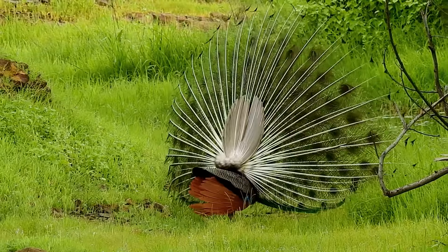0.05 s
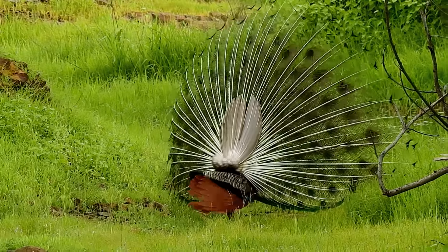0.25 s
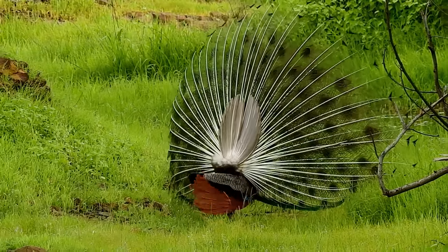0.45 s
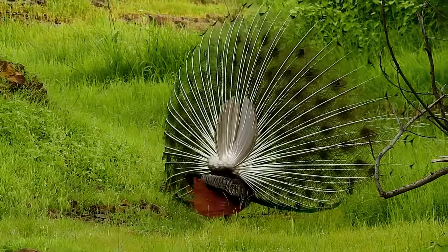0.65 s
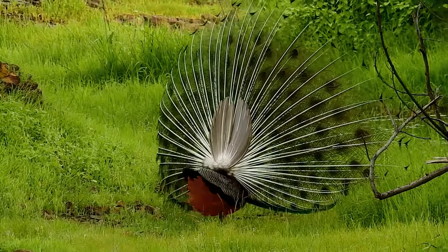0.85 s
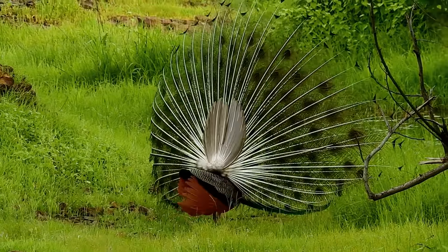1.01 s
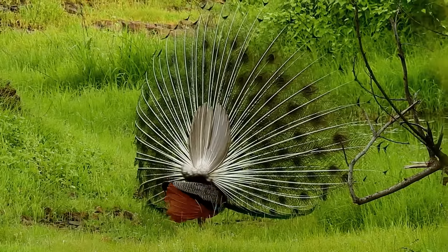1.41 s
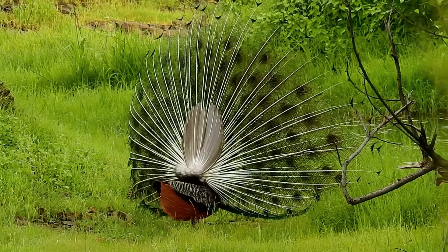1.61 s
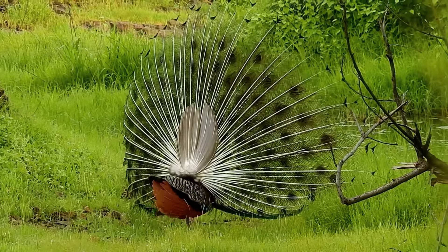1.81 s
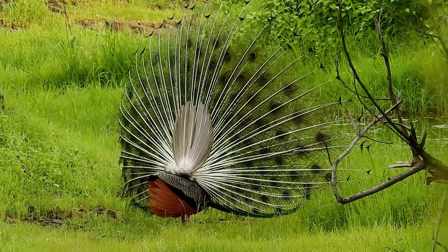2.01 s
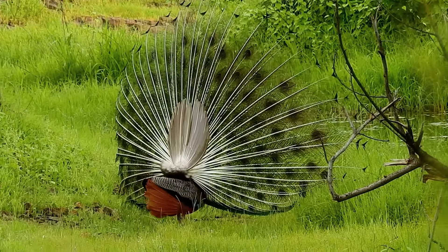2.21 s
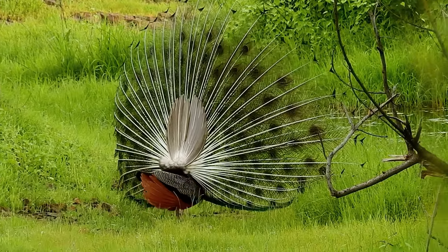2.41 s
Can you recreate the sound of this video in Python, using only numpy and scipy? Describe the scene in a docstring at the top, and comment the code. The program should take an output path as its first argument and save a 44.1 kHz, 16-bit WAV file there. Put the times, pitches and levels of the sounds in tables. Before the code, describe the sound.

A small bird whistles about thirteen quick, high, falling chirps from 0.4 to 1.2 seconds, echoing lightly off trees. Just before, from 0.2 seconds, something dry is handled close by, rustling and snapping, loudest near 0.3 seconds, with a last snap and soft knock around 0.5. A low far-off rumble and faint distant birds fill the meadow throughout and continue alone until about 2.5 seconds.

```python
"""A meadow at the edge of trees: a low far-off rumble and distant birds are heard from the start.
From 0.2 s something dry is handled close by: it rubs, rustles, knocks softly and snaps,
loudest at 0.28 s and for the last time at 0.46 s. From 0.38 s to 1.2 s a small bird whistles
thirteen quick falling chirps that scatter back from the trees. Then the rumble and far birds go on."""
import sys
import numpy as np
from scipy import signal
from scipy.fft import rfft, irfft
from scipy.io import wavfile
from scipy.ndimage import map_coordinates

SR = 44100
rng = np.random.default_rng(int(sys.argv[2]) if len(sys.argv) > 2 else 0)


def to_wav(s):
    """Save 16-bit WAV."""
    ch = np.atleast_2d(s).T  # columns
    pcm = np.round(np.clip(ch, -1, 1) * 32767)  # PCM
    wavfile.write(sys.argv[1], SR, pcm.astype(np.int16))


N = 112454
TIME = np.arange(N) / SR
FREQS = np.fft.rfftfreq(N, 1 / SR)


def from_db(db):
    """Turn decibels into a number to multiply by."""
    return 10 ** (np.asarray(db) / 20)


def rms_one(x):
    """Scale a sound so that its average strength (rms) is 1."""
    return x / np.sqrt(np.mean(x ** 2) + 1e-20)


def pan(db):
    """Left and right gains that make the left side louder by db."""
    return from_db(np.array([[db], [-db]]) / 2)


def at_hz(points, hz):
    """Read between the rows of a table, with every octave equally wide."""
    f, value = np.transpose(points)
    return np.interp(np.log(np.maximum(hz, 1)), np.log(f), value)


def band(x, low_hz, high_hz, order=2):
    """Keep the part of a sound between two frequencies."""
    return signal.sosfilt(signal.butter(order, [low_hz, high_hz], "band", fs=SR, output="sos"), x + 1e-18)


def stereo(pair, likeness):
    """Mix two unrelated sounds into left and right: likeness 0 is unrelated, 1 is the same."""
    return np.sqrt(1 + likeness) * pair[0] + np.sqrt(1 - likeness) * pair[1] * np.array([[1], [-1]])


def coloured(x, colour, resonances=()):
    """Set the balance of low and high, add narrow peaks or dips, and scale to strength 1."""
    peaks_db = sum(db / (1 + (2 * (FREQS - f) / width) ** 2) for f, width, db in resonances)
    return rms_one(irfft(rfft(x) * from_db(at_hz(colour, FREQS) + peaks_db), N))


def narrow_noise(hz, width_hz, likeness):
    """Stereo noise around one pitch, at strength 1."""
    noise = stereo(rng.standard_normal((2, N + SR)), likeness)
    return rms_one(band(noise, hz - width_hz / 2, hz + width_hz / 2)[:, SR:])


def delayed(x, delay_s):
    """The same sound a little later."""
    shift = np.exp(-2j * np.pi * np.fft.rfftfreq(2 * N, 1 / SR) * delay_s)
    return irfft(rfft(x, 2 * N) * shift)[:N]


# how much the background wavers: f/Hz, typical swing/dB
WAVER_DEPTH = [(200, .5), (400, 2), (1200, 3), (3000, 3.5), (5000, 2), (12000, 2.1)]

def waver(x, patch_s=.05, patch_hz=109.7):
    """Neighbouring pitches swell and sink together by chance."""
    hz, times, cells = signal.stft(x, SR, nperseg=1024, noverlap=768)
    chance = rng.standard_normal((600, 200))
    grid = np.meshgrid(hz / patch_hz, times / patch_s, indexing="ij")
    swell = rms_one(map_coordinates(chance, grid, order=3, mode="mirror"))
    gain = from_db(at_hz(WAVER_DEPTH, hz)[:, None] * swell)
    return signal.istft(cells * gain, SR, nperseg=1024, noverlap=768)[1][:, :N]


# tone of the rumble and hiss: f/Hz, relative level/dB
AIR_COLOUR = [(15, -50), (25, -19), (40, -12.5), (74, -2.5), (92, -1.5), (117, -5.5), (172, -7),
              (218, -15.5), (255, -23.5), (362, -20.5), (711, -23), (800, -27.5), (1500, -36.5),
              (3000, -41.5), (4700, -37), (5500, -35.5), (6900, -35), (7900, -43.5), (9100, -40.5),
              (10300, -48.5), (12500, -52.5), (15500, -57.5)]
# how alike left and right are: f/Hz, likeness (0 to 1)
AIR_SIDES_ALIKE = [(50, 1), (170, 0.93), (600, 0.9), (1500, 0.67), (4000, 0.14), (12000, 0.079)]
# hums within the rumble: f/Hz, width/Hz, level/dB
HUMS = [(86.54, 9.6, -48), (209.6, 11.7, -56.5), (494.2, 21, -63), (606.3, 33, -63.5)]

def background():
    """Far rumble with a few wavering hums, and faint hiss from the leaves."""
    noise = rng.standard_normal((2, N))
    air = irfft(stereo(rfft(noise), at_hz(AIR_SIDES_ALIKE, FREQS)), N)
    air = from_db(-40.5) * coloured(waver(air), AIR_COLOUR)
    hums = sum(from_db(db) * narrow_noise(f, width, at_hz(AIR_SIDES_ALIKE, f)) for f, width, db in HUMS)
    return pan(-.74) * (air + hums)


# rise and fall of the deep rumble around its own average: t/s, relative level/dB
RUMBLE_SWELLS = [(0.0, -48.5), (0.1, -38.5), (0.15, -43), (0.92, -46), (1.07, -40), (1.13, -41.5),
                 (1.19, -35.5), (1.22, -52), (1.26, -33), (1.3, -53), (1.34, -37), (1.4, -43), (2.04, -42),
                 (2.23, -45.5), (2.26, -41), (2.55, -42)]

def swell_rumble(x, top_hz=125):
    """The deepest part of the background rises and falls."""
    level_db = np.interp(TIME, *np.transpose(RUMBLE_SWELLS))
    deep = signal.sosfiltfilt(signal.butter(4, top_hz, fs=SR, output="sos"), x)
    return x + deep * (from_db(level_db - level_db.mean()) - 1)


# calls of distant birds: start t/s, length/s, f/Hz, width/Hz, level/dB
DISTANT_CALLS = [(-.05, 0.16, 6560, 700, -57.5), (0.11, 0.29, 5460, 300, -54.5),
                 (0.446, 0.071, 2910, 400, -56), (0.632, 0.22, 2360, 915, -59),
                 (0.818, .17, 2590, 700, -60.5), (1.202, 0.075, 2750, 700, -65),
                 (1.19, 0.21, 5400, 400, -56.5), (1.347, 0.043, 3250, 302, -60.5),
                 (1.397, 0.15, 6370, 690, -58.5), (1.57, 0.14, 6960, 600, -61),
                 (1.73, .26, 5450, 280, -58.5), (1.8, 0.2, 2540, 900, -67), (2.027, 0.12, 6700, 600, -62),
                 (2.123, .13, 7150, 600, -68), (2.348, .1, 5480, 280, -57), (2.438, .2, 5450, 260, -56),
                 (2.45, .17, 6850, 700, -60.5)]

def far_birds(fade_s=.088):
    """Blurred by the trees, each distant call arrives as a soft swell of noise around one pitch."""
    calls = 0
    for start, length, hz, width_hz, db in DISTANT_CALLS:
        swell = np.clip(np.minimum(TIME - start, start + length - TIME) / fade_s + .5, 0, 1)
        calls += from_db(db) * swell * narrow_noise(hz, width_hz, likeness=.37)
    return calls


# echoes from bushes and trees: delay/s, time to fade by 60 dB/s, level/dB
TREE_ECHOES = [(.009, .15, -4), (0.036, 1.0, -8)]

def trees(x):
    """Bushes and trees send a sound back as many fading echoes, different on each side."""
    t = TIME[:SR]
    echoes = 0
    for delay_s, fade_s, db in TREE_ECHOES:
        tail = rng.standard_normal((2, SR)) * (t > delay_s) * from_db(-60 * t / fade_s)
        echoes += from_db(db) * rms_one(tail) / np.sqrt(SR)
    return signal.fftconvolve(x[None], echoes, axes=1)[:, :N]


# tone of the chirps' echoes: f/Hz, level change/dB
SCATTER_COLOUR = [(4700, -2), (5150, 4.5), (5450, 7), (5750, 1), (6020, -3), (6300, 5.5), (6800, 0.5)]

def colour_scatter(x):
    """Dip the chirps' echoes at 6 kHz, where the whistle lingers, giving an even wash."""
    return irfft(rfft(x) * from_db(at_hz(SCATTER_COLOUR, FREQS)), N)


# the near bird's chirps: start t/s, level/dB
SONG = [(.382, -39), (.443, -37.5), (0.5073, -38.5), (.5655, -38.5), (0.626, -39), (0.692, -38),
        (0.753, -38.5), (0.815, -38), (0.8837, -37.5), (0.951, -38.5), (1.0348, -39), (1.1115, -39.5),
        (1.193, -39)]
# falling pitch of every chirp: progress (0 to 1), f/Hz
CHIRP_FALL = [(0, 7050), (.1, 6530), (.22, 6170), (.36, 6000), (.48, 5980), (.62, 5680), (.78, 5350),
              (1, 4700)]
# loudness within every chirp: progress (0 to 1), level change/dB
CHIRP_SHAPE = [(0, -12), (.12, -6), (.28, -5), (.41, 2), (.52, -7), (.62, 0), (.77, -17), (.9, -13),
               (1, -18)]

def near_bird(chirp_s=.025, fade_s=.00089, pitch_spread=.0054):
    """Each chirp is a pure falling whistle that lingers midway; the ground and trees send it back."""
    song, scattered = np.zeros(N), np.zeros(N)
    for (start, db), detune in zip(SONG, rng.standard_normal(len(SONG))):
        t = TIME - start
        pitch = np.interp(t / chirp_s, *np.transpose(CHIRP_FALL)) * (1 + pitch_spread * detune)
        shape_db = np.interp(t / chirp_s, *np.transpose(CHIRP_SHAPE))
        fade = np.sin(np.pi / 2 * np.clip(np.minimum(t, chirp_s - t) / fade_s, 0, 1)) ** 2
        whistle = from_db(db) * fade * np.sqrt(2) * np.sin(2 * np.pi * np.cumsum(pitch) / SR)
        song += whistle * from_db(shape_db)
        scattered += whistle * from_db(.81 * shape_db)  # loudness is more even in the echoes
    ground_echo = from_db(-3.5) * delayed(song, delay_s=.0036)
    return pan(-2.5) * (song + ground_echo) + trees(colour_scatter(scattered))


# soft knocks of the handled object: t/s, starting level/dB
SOFT_KNOCKS = [(.2670, -53), (0.4492, -33.5)]

def knocks(note_hz=524, ring_s=.051):
    """Each soft knock rings the object's lowest note, which fades by 60 dB in ring_s."""
    sound = 0
    for start, db in SOFT_KNOCKS:
        age = np.maximum(TIME - start, 0)
        sound += from_db(db - 60 * age / ring_s) * np.sin(2 * np.pi * note_hz * age)
    return sound


# pitches at which the object rings, and one that it dulls: f/Hz, width/Hz, level change/dB
OBJECT_RESONANCES = [(562, 86, 9.5), (840, 43, 4.5), (1281, 102, 13.5), (1790, 105, 8.5), (2315, 58, 11.5),
                     (2540, 99, 10), (2990, 88, 4.5), (3140, 65, 8), (3900, 220, 5.5), (5120, 120, -12.5),
                     (5740, 140, 4), (6390, 180, 6)]

def friction(strokes, colour, attack_s, release_s, likeness, slips_per_s=5000):
    """Dry surfaces slide in many tiny slips, under strokes that rise, hold and die away."""
    slips = (rng.random((2, N)) < slips_per_s / SR) * rng.choice([-1, 1], (2, N))
    sizes = from_db(.5 * np.minimum(rng.exponential(1, (2, N)), 3))
    force = 0
    for start, length, db in strokes:
        rise = np.clip((TIME - start) / attack_s, 0, 1)
        fall = np.exp(-np.maximum(TIME - start - length, 0) / release_s)
        force += from_db(db) * rise * fall
    return force * coloured(stereo(slips * sizes, likeness), colour, OBJECT_RESONANCES)


# rubbing strokes: start t/s, length/s, level/dB
RUB_STROKES = [(.209, 0.033, -40.5), (.255, 0.014, -35.5), (.267, 0.0033, -28.5), (.272, 0.0047, -31.5),
               (.447, 0.0092, -40.5)]
# their dull tone: f/Hz, relative level/dB
RUB_TONE = [(200, -3.5), (500, -6.5), (1000, -17), (1700, -8.5), (2200, -11), (2700, -1.5), (3800, -1.5),
            (5000, -17.5), (8000, -20), (15000, -66)]

def rubs():
    """Dull friction that leads into the rustles."""
    return friction(RUB_STROKES, RUB_TONE, attack_s=.0005, release_s=.0021, likeness=.89)


# rustling strokes: start t/s, length/s, level/dB
RUSTLE_STROKES = [(.2235, 0.0078, -23.5), (.236, 0.012, -34.5), (.266, 0.0053, -23.5), (.280, 0.052, -23.5),
                  (.338, 0.025, -46.5), (.459, 0.0039, -31)]
# their bright tone: f/Hz, relative level/dB
RUSTLE_TONE = [(250, -77), (600, -18.5), (1000, -27), (1400, -38), (1800, -25.5), (2400, -27.5),
               (2950, -17.5), (3650, -18.5), (4900, 0), (5700, -4.5), (6500, -1), (7300, -7.5), (8100, -15),
               (10300, -22.5), (12000, -35), (15500, -41)]

def rustles():
    """Short bursts of bright friction."""
    return friction(RUSTLE_STROKES, RUSTLE_TONE, attack_s=.00067, release_s=.0048, likeness=.7)


# sharp snaps: t/s, level/dB, left over right/dB
SHARP_SNAPS = [(0.206, -27.5, 0), (0.2197, -17, 0), (0.2766, -3, 2), (0.4571, -15.5, 0.5)]
# bounces of each snap: delay from its listed time/s, level change/dB
BOUNCES = [(.0012, -14.5), (.0024, -6.5), (.0035, -4.5), (.0056, -32)]

def snaps(first_hit_s=.00084):
    """A click rings very briefly, with a broad crack on top, and bounces within milliseconds."""
    click = signal.unit_impulse(SR // 50)
    ring = band(click, low_hz=5120, high_hz=7240, order=3)
    crack = band(click, low_hz=3930, high_hz=7860)
    snap = ring / np.abs(ring).max() + from_db(-2) * crack / np.abs(crack).max()
    hits = np.zeros((2, N))
    for start, db, pan_db in SHARP_SNAPS:
        for delay_s, change_db in [(first_hit_s, 0)] + BOUNCES:
            hits[:, int(start * SR) + int(delay_s * SR)] += from_db(db + change_db) * pan(pan_db)[:, 0]
    return signal.fftconvolve(hits, snap[None], axes=1)[:, :N]


def handling():
    """The dry object is a little to the left, so the right side hears it later; the trees echo it."""
    left, right = rustles() + rubs() + snaps() + knocks()
    direct = np.array([left, delayed(right, delay_s=.000022)])
    return direct + from_db(-18) * trees((left + right) / 2)


def scene():
    """Handling up close, with the birds and the rumble behind it."""
    return handling() + near_bird() + far_birds() + swell_rumble(background())


def record(dry, cutoff_hz=15800):
    """Clip anything beyond full scale, then cut the highest treble."""
    treble_cut = signal.ellip(10, .1, 80, cutoff_hz, fs=SR, output="sos")
    return signal.sosfilt(treble_cut, np.clip(dry, -1, 1))


dry = scene()
out = record(dry)
to_wav(out)
```